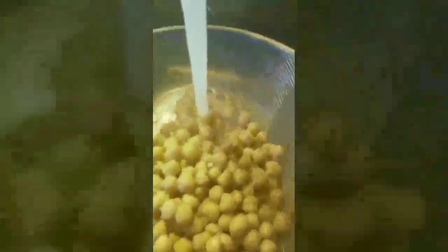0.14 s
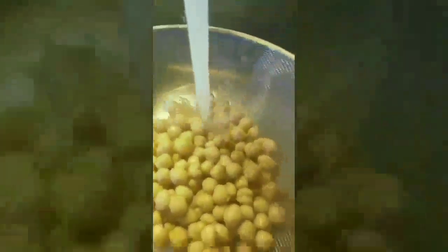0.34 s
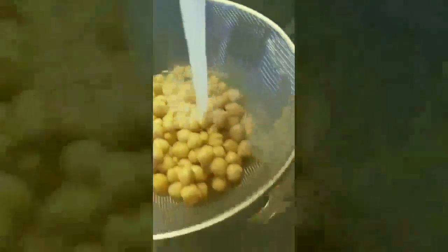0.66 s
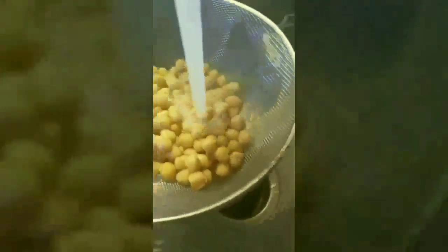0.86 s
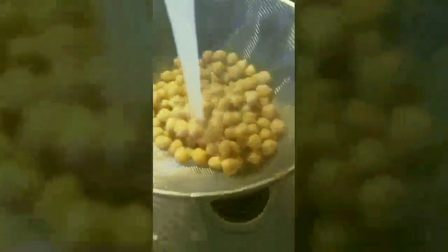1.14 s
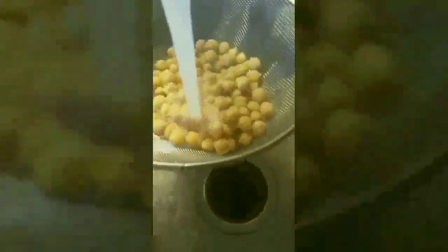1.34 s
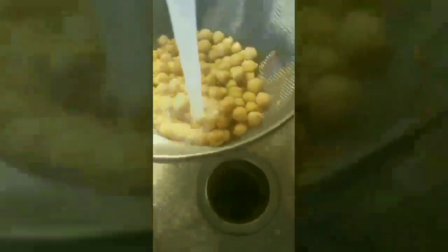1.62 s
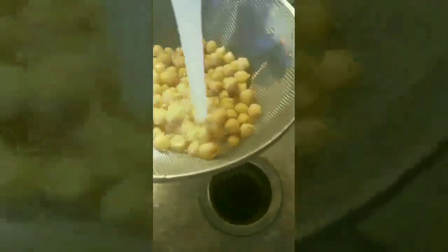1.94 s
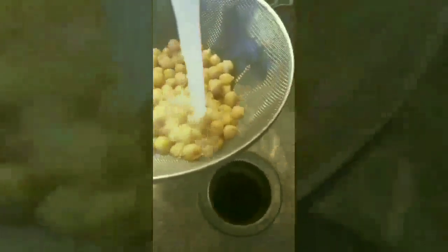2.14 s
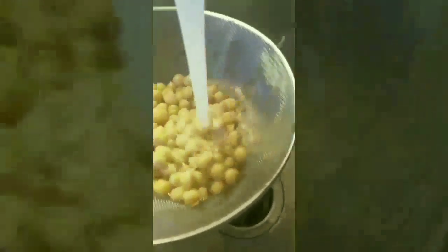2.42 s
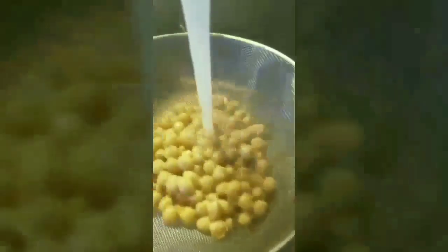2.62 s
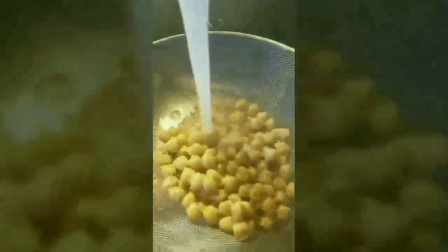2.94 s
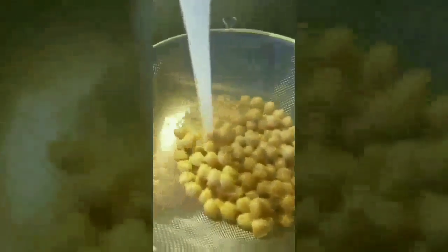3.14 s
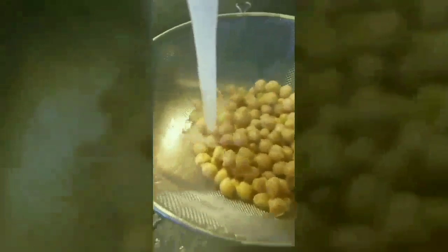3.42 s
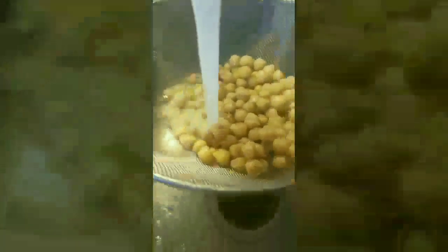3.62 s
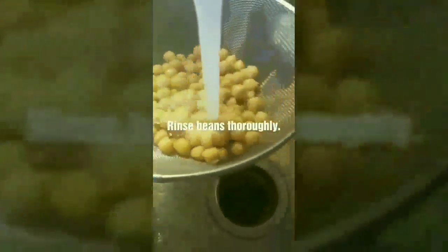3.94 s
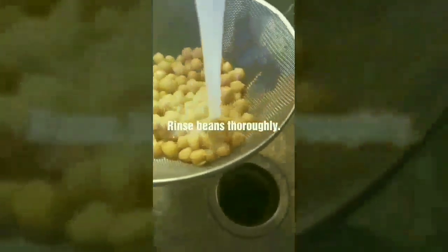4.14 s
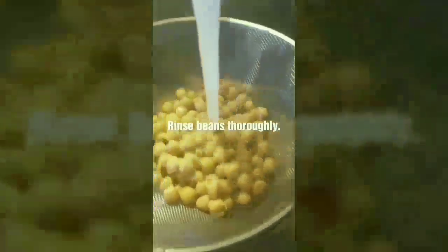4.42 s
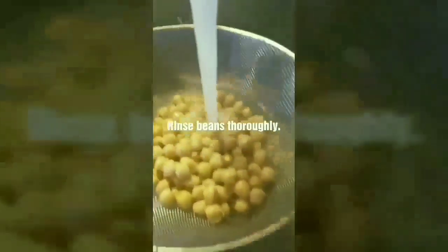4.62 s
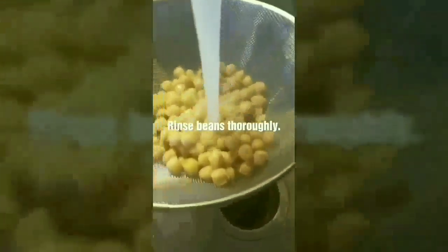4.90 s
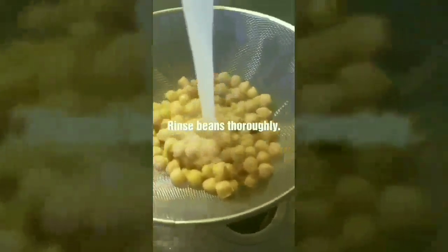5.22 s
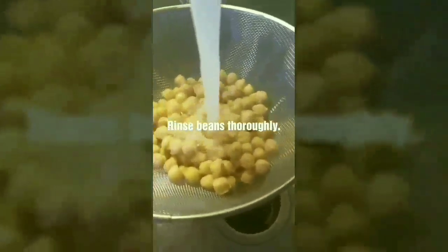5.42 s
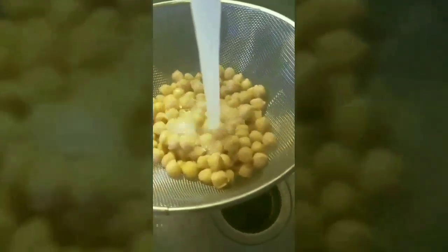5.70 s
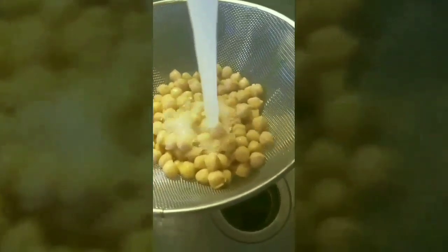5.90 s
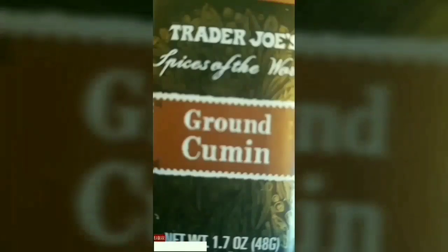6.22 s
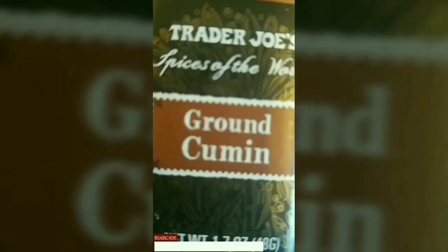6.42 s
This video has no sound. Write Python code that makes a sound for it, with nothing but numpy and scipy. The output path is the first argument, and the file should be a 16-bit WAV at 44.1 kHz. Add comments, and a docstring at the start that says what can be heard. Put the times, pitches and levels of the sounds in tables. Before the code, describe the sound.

Tap water hisses brightly onto beans in a wire strainer over a steel sink, with low uneven drumming below, then stops abruptly.

```python
"""A bright, hissing rush of water over a low, uneven drumming is heard at once: a tap runs onto
beans in a wire strainer that is moved about over a steel sink. The aerated jet is made of random
drops and bubbles, with resonators for the ringing metal. Runoff drives lower modes of the sink
floor, with swelling tones for slops and plops and filtered drop clusters for gushes that spatter
on the steel. The sound stops abruptly."""
import sys
import numpy as np
from scipy import signal
from scipy.fft import rfft, irfft, next_fast_len
from scipy.io import wavfile
from scipy.ndimage import uniform_filter1d

SR = 44100
rng = np.random.default_rng(int(sys.argv[2]) if len(sys.argv) > 2 else 0)


def transcribe(u):
    """Save the signal u as a 16-bit wav file named by the first command-line argument.

    u: samples, shape (n,) or (channels, n), limited to [-1, 1]; the rate is SR.
    q: integer samples, one column per channel.
    """
    v = np.clip(np.atleast_2d(u).T, -1, 1)
    q = np.round(v * 32767).astype(np.int16)
    wavfile.write(sys.argv[1], SR, q)


N = 289296
TIME = np.arange(N) / SR   # seconds

# In every table, left-right is the level of the left side over the right.
# Strength of the jet on the beans, weakest where it slips onto the bare mesh.
# Each row: time in seconds, relative level in dB.
JET_STRENGTH = [(0.0, -24.5), (0.45, -25.5), (0.75, -24.5), (1.08, -26), (1.62, -25), (1.75, -24.5),
                (2.5, -27.0), (2.65, -28), (3.1, -27), (3.22, -26.5), (3.75, -25.5), (3.95, -26.5),
                (4.22, -25.5), (4.45, -26), (5.1, -25.5), (5.55, -26), (5.95, -25), (6.35, -26)]
# Colour of the splashes. Each row: frequency in Hz, relative level per Hz in dB, left-right in dB.
SPLASH_SPECTRUM = [(498, -19, -13.5), (1055, -25.5, -5), (1263, -17, -2), (1643, -6, 0), (1970, -7, 0),
                   (2270, -4.5, -2.5), (2840, -3, -3), (3500, -1, 2.5), (4400, -0.5, -0.5),
                   (5920, -7.5, -3), (8900, -23.5, 7.5)]
# Colour of the fine spray. Each row: frequency in Hz, relative level per Hz in dB, left-right in dB.
SPRAY_SPECTRUM = [(3000, -38, 5.5), (4370, -2, 0), (5830, -1, 1), (7400, -0.7, 2.5), (8850, -2.5, -1),
                  (10100, 1, 1), (12200, 2, 1), (14100, -1.5, 2.5), (14880, -0.5, 6), (15600, -17.5, -2)]
# Resonances of strainer and basin under the splashes. Each row: frequency in Hz, width in Hz,
# relative level in dB, left-right in dB, phase lead of the left side in radians.
SPLASH_RESONANCES = [(1450, 80, -23, -3, 2.5), (1720, 90, -12.5, -1, -2.8), (1980, 90, -22, 0, -2.8),
                     (2207, 42, -16.5, 2, -2.2), (2422, 120, -16.5, 0, -1.2), (2939, 70, -13.5, 8, .4),
                     (3029, 42, -10.5, 1, -.1), (3122, 44, -10.5, 4, .5), (3207, 60, -11.5, 9, .8),
                     (3416, 75, -14.2, 8, 1.2), (3700, 140, -14, 0, .9), (4085, 110, -10.3, 2, 1),
                     (4370, 150, -9, -7, 2.4)]
# Resonances of strainer and basin under the spray. Each row: frequency in Hz, width in Hz,
# relative level in dB, left-right in dB, phase lead of the left side in radians.
SPRAY_RESONANCES = [(7967, 130, -18, 1, .4), (9515, 160, -20, 6, -2.6), (10476, 100, -16, 6, .9),
                    (10690, 80, -16, 4, .6), (11725, 80, -8.3, 0, -2.1), (12054, 110, -17, 7, .7),
                    (12470, 110, -11.5, 9, 0), (12625, 240, -13.5, 4, .4), (12990, 250, -12.5, 12, -.6),
                    (13539, 175, -12.3, 9, -1.6)]
# The stream reaches the wire and the metal rings out.
# Each row: time of the height in seconds, half length (to 1/e of the dB) in seconds, extra level in dB.
METAL_SWELLS = [(1.55, .18, 3), (4.39, .06, 3), (5.8, 0.09, 1.5)]
# The clearest ring of the wire, which follows where the stream lands.
# Each row: time in seconds, relative level in dB, pitch shift in Hz.
WIRE_PATH = [(0.0, -8, 0), (0.2, -11, 0), (0.4, -10.5, 0.5), (0.9, -12, 0), (1.28, -6.5, -20.5),
             (1.5, -12.5, 0), (1.8, -11.5, 24.5), (2.2, -6.5, 30), (2.75, -7.5, 20), (3.1, -14, 0),
             (3.42, -8, 40), (3.75, -12.5, -1.5), (3.95, -8.5, -13.5), (4.25, -9, -20.5), (4.7, -10, -20),
             (5.2, -11, -29.5), (5.45, -8.5, -35), (5.8, -8.5, 5), (6.12, -8, 11), (6.3, -7, 10)]
# Its two close modes. Each row: frequency in Hz, width in Hz, relative level in dB,
# left-right in dB, phase lead of the left side in radians.
WIRE_RESONANCES = [(2594, 40, -1.6, -7, .1), (2660, 56, -4.5, 0, .4)]
# Water falling through the strainer as it is moved about. Each row: time in seconds, relative level
# of the drumming in dB, tilt in dB (added to the left; 0.3 of it is taken from the right).
RUNOFF_PATH = [(0.0, -51.5, -2.5), (0.4, -50, -2), (0.75, -50.5, -3), (1.1, -50.5, -4.5), (1.45, -51.5, -3),
               (1.7, -50.5, -2.5), (2.15, -51, -7), (2.4, -54.5, -1), (2.6, -54.5, 0.5), (3.1, -54, -1),
               (3.3, -52, -2.5), (3.75, -49.5, -2), (4.2, -54.5, -2.5), (4.6, -52.5, -3), (4.95, -51, -4.5),
               (5.3, -50.5, -3.5), (5.5, -53.5, -5.5), (6.05, -50, -0.5), (6.35, -54, -1)]
# Modes of the sink floor. Each row: frequency in Hz, width in Hz, relative level in dB,
# left-right in dB, phase lead of the left side in radians.
SINK_RESONANCES = [(60, 10, -14.5, -8, .3), (119, 27, -3.3, -1.2, -.1), (178, 30, -5.2, -.3, 0),
                   (235, 35, -11.5, -3, -.5), (290, 48, -4.2, -5, -.4), (365, 50, -8.3, -6.5, -.2),
                   (505, 38, -8.2, -10, 0), (590, 50, -11, -9, 1.5), (691, 28, -11, -16, -2.6),
                   (888, 52, -5.7, -3, 2.4), (1081, 36, -11, -10, -.5), (1255, 40, -9, 7, -1.5)]
# Colour of the runoff. Each row: frequency in Hz, relative level per Hz in dB, left-right in dB.
RUNOFF_SPECTRUM = [(20, -37, -7.5), (38, -20.5, -10.5), (61.5, -11, -2), (120, -7.5, 5), (300, -4, -2.5),
                   (600, 0, -30), (1000, 0, 4.5), (1800, -15.5, 6.5)]
# Big bubbles ringing and bursting, on the beans and in the basin. Each row: time of the height in
# seconds, frequency in Hz, peak before panning in dB, swell in seconds, decay in seconds, left-right in dB.
BUBBLE_PLOPS = [(.084, 1480, -43, .005, .007, -1), (.184, 1700, -37, .006, .008, 12),
                (.335, 1760, -32, 0.009, 0.013, 9.5), (.395, 1840, -38, 0.0083, .01, 5),
                (.419, 1710, -37, .004, .0058, -2.5), (.651, 1820, -34.5, 0.0076, 0.0071, -2),
                (1.345, 1760, -43, 0.0033, .007, 0), (1.546, 1711, -44, .007, .009, -3),
                (4.214, 1630, -38, 0.0059, 0.0087, -2), (.026, 2610, -40, 0.013, .014, -14),
                (.066, 2630, -41, .013, .015, -1), (1.303, 2580, -32, .008, .012, -12),
                (1.612, 3040, -34, .018, .018, 3), (1.655, 4080, -32, .012, .013, 6),
                (1.667, 2637, -31.5, .014, .014, -6), (1.930, 4250, -36, .012, .012, -1),
                (3.953, 2600, -38, .011, .013, 1), (4.222, 2610, -34, .018, .02, -5),
                (4.991, 3046, -35, .006, .008, -2), (5.186, 3490, -33, .007, .009, 11),
                (5.264, 2600, -34, .008, .01, -2), (5.370, 3030, -36.5, 0.0072, .01, 3),
                (5.402, 2583, -35, .012, 0.016, -12), (5.801, 3130, -37.5, .014, .015, -1),
                (6.054, 3133, -33, .008, 0.011, 3), (6.135, 2205, -36.5, 0.016, 0.013, 0),
                (6.238, 3046, -36, .014, .011, -1), (6.266, 2630, -32, .008, .012, -10.5),
                (6.308, 2627, -34, .013, .013, -1)]
# Heavier slops landing on the sink floor. Each row: time of the height in seconds, frequency in Hz,
# peak before panning in dB, swell in seconds, decay in seconds, left-right in dB.
FLOOR_SLOPS = [(.052, 322, -42.5, 0.008, .012, -9), (.100, 288, -44, 0.0067, 0.014, -4),
               (.298, 237, -36, .006, 0.0098, -7), (.312, 507, -38.5, 0.0056, 0.0046, -7),
               (.314, 330, -39, .004, .008, -6), (.364, 200, -40.5, .004, .008, -6),
               (.378, 400, -45.5, .006, .009, -7), (.426, 330, -36.5, .0065, .008, -12),
               (.463, 276, -41.5, 0.0057, .012, -7), (.622, 307, -44, .005, .008, -2.5),
               (.750, 287, -43, 0.0042, 0.0071, 0), (2.543, 298, -42, 0.0038, 0.0061, 7),
               (3.277, 126, -40, .012, .03, -4), (3.364, 119, -32, .016, 0.013, -1),
               (3.660, 298, -41, 0.011, 0.022, -13), (3.728, 288, -33.5, 0.0042, .006, -8),
               (3.799, 265, -38.5, 0.0046, .006, -9), (3.801, 160, -45, .015, .03, -4),
               (3.895, 305, -38.5, .006, .008, -11), (3.901, 142, -31, 0.0072, 0.0045, 0),
               (4.050, 514, -44, .004, 0.0092, -6), (4.570, 118, -41, 0.0076, .01, -5),
               (4.805, 128, -40.5, 0.012, .012, -14.5), (5.206, 517, -39.5, 0.0049, .006, -11),
               (6.122, 286, -44, .006, .012, -4)]
# Gushes that spill from the mesh and spatter on the steel. Each row: time of the height in seconds,
# level before the lowpass in dB, swell in seconds, decay in seconds, lowpass corner in Hz.
GUSHES = [(.303, -42, .008, .01, 900), (.428, -33.5, .008, .012, 1100), (2.543, -34, .002, .008, 1300),
          (2.557, -38, 0.0057, 0.0088, 3000), (3.42, -44.5, 0.17, .09, 2600),
          (3.67, -41.5, 0.045, 0.089, 2400), (3.883, -37, .008, .012, 1000)]
# Colour of the gushes. Each row: frequency in Hz, relative level per Hz in dB, left-right in dB.
GUSH_SPECTRUM = [(130, -20.5, 3.5), (350, -6, -6), (900, 1.5, -2.5), (1300, 1.5, -6), (2200, 10.5, 4),
                 (4000, -20, 1)]

LEFT_LEAD_S = 14 / 44100   # direct drops reach the left side first
SPLASH_DB, SPRAY_DB = -10.5, -7   # shares of the jet
SPLASH_SWING = 0.12   # extra dB of splash per dB of jet
STOP_S, STOP_DB_PER_S = 6.357, 786
MIC_LOW_HZ, CUTOFF_HZ = 32, 15700


def from_db(db):
    """Logarithmic level: decibels become an amplitude gain."""
    return 10 ** (np.asarray(db) / 20)


def rms_one(x):
    """Normalization: a signal is scaled to unit root-mean-square."""
    return x / np.sqrt(np.mean(x ** 2) + 1e-20)


def in_time(rows):
    """Interpolation in decibels: each level column becomes a gain curve."""
    s, *columns = np.transpose(rows)
    return [from_db(np.interp(TIME, s, c)) for c in columns]


def panned(pan_db):
    """Level difference between the sides: left and right gains of mean power 1."""
    pair = from_db(np.array([[.5], [-.5]]) * pan_db)
    return pair / np.sqrt(np.mean(pair ** 2, axis=0))


def drift(rate):
    """Lowpass noise: slow chance of spread 1, with both poles at the rate in Hz."""
    step = 40   # samples between computed points
    r = np.exp(-2 * np.pi * rate * step / SR)
    settling = 2000
    noise = rng.standard_normal(N // step + settling + 2)
    slow = signal.lfilter([1], [1, -2 * r, r * r], noise)[settling:]
    return np.interp(np.arange(N) / step, np.arange(len(slow)), rms_one(slow))


def surge(depth_db, rate):
    """Slow amplitude modulation: a gain that wanders by chance."""
    return from_db(depth_db * drift(rate))


def flutter(rate):
    """Bandpass chance: slow swings are removed, leaving quick ones around one rate, of spread 1."""
    quick = drift(rate)
    return rms_one(quick - uniform_filter1d(quick, int(SR / rate)))


def hump(t, swell_s, decay_s):
    """Transient envelope: a Gaussian swell to 1 at t = 0, then exponential decay."""
    return np.exp(-np.where(t < 0, (t / swell_s) ** 2, t / decay_s))


def impacts(per_s, spread_db):
    """Random arrivals: drops land independently, many small and a few large."""
    sizes = from_db(spread_db * np.minimum(rng.exponential(1, N), 5))
    signs = rng.choice([-1, 1], N)
    return sizes * signs * (rng.random(N) < per_s / SR)


def patter(colour, per_s, spread_db, scatter_s, patchy_db, direct, count=5):
    """Direct sound and scattering: each drop is heard, left first, then echoed by the steel walls."""
    drops = impacts(per_s, spread_db)
    at = np.flatnonzero(drops)
    out = direct * np.array([drops, np.roll(drops, round(LEFT_LEAD_S * SR))])
    for side in out:
        late = rng.exponential(scatter_s * SR, (len(at), count)).astype(int)
        echoes = drops[at, None] * rng.standard_normal(late.shape) / np.sqrt(count)
        side += np.bincount((at[:, None] + late).ravel(), echoes.ravel(), N)[:N]

    hz, level_db, pan_db = np.transpose(colour)
    log_hz = np.log(hz)
    size = next_fast_len(N)
    grid = np.log(np.arange(size // 2 + 1) * SR / size + 1)
    level = from_db(np.interp(grid, log_hz, level_db))
    spectrum = rfft(out, size) * level * panned(np.interp(grid, log_hz, pan_db))
    # each part of the colour flickers by itself, by chance, so the sound is patchy
    total = np.zeros((2, N))
    for row in np.eye(len(hz)):
        share = np.interp(grid, log_hz, row)
        band = irfft(spectrum * share, size)[:, :N]
        total += band * surge(patchy_db, rate=15.3)
    return rms_one(total)


def ringing(modes, per_s, spread_db, patchy_db, diffuse, sway_db, wander_hz=0, shift_hz=0):
    """Modal resonance: drops keep each mode ringing; level and pitch wander as the water shifts."""
    out = np.zeros((2, N))
    for hz, width, level_db, pan_db, lead in modes:
        drops = impacts(per_s, spread_db) * from_db(patchy_db * flutter(8.5))
        pole = np.exp((2j * np.pi * hz - np.pi * width) / SR)
        # a second, broader pole: far from its pitch a mode hardly radiates
        broad_pole = pole * np.exp(-3 * np.pi * width / SR)
        ring = signal.lfilter([1], np.poly([pole, broad_pole]), drops + 1e-18)
        bend = 2 * np.pi * np.cumsum(shift_hz + wander_hz * drift(3)) / SR
        turn = bend + np.angle(ring)
        # each side hears its own phase and strength, which sway as the point of impact moves
        left = np.cos(turn + lead + diffuse * drift(21))
        right = np.cos(turn)
        sway = from_db(sway_db * drift(10.3) / 2)
        sides = rms_one(np.abs(ring) * np.array([left * sway, right / sway]))
        out += from_db(level_db) * panned(pan_db) * sides
    return out


def swells(rows):
    """Smooth amplitude modulation: a gain of 1 that rises in Gaussian humps."""
    return from_db(sum(extra_db * np.exp(-((TIME - s) / half_s) ** 2) for s, half_s, extra_db in rows))


def wire():
    """Wandering resonance: the strainer's clearest ring flutters and bends as the stream moves over it."""
    s, level_db, shift_hz = np.transpose(WIRE_PATH)
    ring = ringing(WIRE_RESONANCES, per_s=1500, spread_db=1.5, patchy_db=1.2, diffuse=.5, sway_db=2,
                   wander_hz=18, shift_hz=np.interp(TIME, s, shift_hz))
    contact = rms_one(from_db(3 * np.tanh(1.5 * flutter(11))))
    return from_db(np.interp(TIME, s, level_db)) * contact * ring


def bubbles(per_s, low_hz, high_hz, cycles, rise, spread_db):
    """Bubble resonance: trapped air rings at a pitch of its own, rising as it nears the surface."""
    t = TIME[:int(.03 * SR)]   # a bubble still ringing after 0.03 s is cut off
    count = int(per_s * N / SR)
    when, size, pitch, place, lead = rng.random((count, 5)).T[:, :, None]
    hz = low_hz * (high_hz / low_hz) ** pitch
    age = t * hz / cycles   # at 1 the decay reaches 60 dB
    phase = 2 * np.pi * hz * t * (1 + rise * np.minimum(age, 1))
    onset = (1 - np.exp(-t * hz / 2)) ** 2
    envelope = from_db(-spread_db * np.log(size + .01) - 60 * age) * onset
    at = ((when * N).astype(int) + np.arange(len(t))).ravel()
    left = np.sqrt(place) * np.sin(phase + 2 * np.pi * lead)
    right = np.sqrt(1 - place) * np.sin(phase)
    return rms_one(np.array([np.bincount(at, (envelope * side).ravel(), N)[:N] for side in (left, right)]))


def basin(x, wet_db, decay_s, count=6):
    """Diffuse reflection: dense echoes of sink and worktop differ by side, shifting as the strainer moves."""
    t = TIME[:int(.08 * SR)]
    echoes = rng.standard_normal((count, 2, len(t))) * np.exp(-t / decay_s) * (t > .003)
    echoes /= np.sqrt(np.sum(echoes ** 2, axis=2, keepdims=True))
    shares = np.array([drift(4) for _ in echoes])
    shares /= np.sqrt(np.sum(shares ** 2, axis=0))
    wet = sum(share * signal.oaconvolve(x, path, axes=1)[:, :N] for share, path in zip(shares, echoes))
    return x + from_db(wet_db) * wet


def jet():
    """Jet breakup: the stream bursts on the beans into splashes, small bubbles and spray that surge together."""
    strength, = in_time(JET_STRENGTH)
    splash = from_db(0.18) * patter(SPLASH_SPECTRUM, per_s=5000, spread_db=1.5, scatter_s=.003,
                                    patchy_db=2.0, direct=0.35)
    metal = ringing(SPLASH_RESONANCES, per_s=1500, spread_db=1.8, patchy_db=2.0, diffuse=.55,
                    sway_db=2.5, wander_hz=24)
    splash += from_db(-2.0) * swells(METAL_SWELLS) * surge(depth_db=.5, rate=8) * metal
    splash += wire()
    fizz = bubbles(per_s=240, low_hz=2900, high_hz=9000, cycles=360, rise=.014, spread_db=3.3)
    splash += from_db(-7) * fizz
    spray = from_db(1.0) * patter(SPRAY_SPECTRUM, per_s=14000, spread_db=1.5, scatter_s=.002,
                                  patchy_db=1.24, direct=0.37)
    sizzle = ringing(SPRAY_RESONANCES, per_s=4000, spread_db=1.8, patchy_db=2.0, diffuse=.55,
                     sway_db=1.5, wander_hz=30)
    spray += from_db(-2.2) * sizzle
    # the splashes swing further with the jet than the spray does
    splash *= (strength / strength.mean()) ** SPLASH_SWING
    mix = from_db(SPLASH_DB) * splash + from_db(SPRAY_DB) * spray
    # the strength wanders as the beans shift under the stream
    water = strength * surge(depth_db=0.05, rate=13) * mix
    return basin(water, wet_db=-10.5, decay_s=.014)


def bursts(rows, lead, glide):
    """Transient resonance: a lump of water swells into one tone that dies, the pitch creeping up."""
    out = np.zeros((2, N))
    for s, hz, peak_db, swell_s, decay_s, pan_db in rows:
        near = np.abs(TIME - s) < .2
        t = TIME[near] - s
        tone = np.exp(2j * np.pi * (hz * t * (1 + glide * t) + rng.random()))
        ring = from_db(peak_db) * hump(t, swell_s, decay_s) * tone
        out[:, near] += panned(pan_db) * np.array([(ring * np.exp(1j * lead)).real, ring.real])
    return out


def runoff():
    """Impact excitation: water from the mesh drums on the sink floor and gurgles in the film that covers it."""
    drum_gain, tilt = in_time(RUNOFF_PATH)
    drum = ringing(SINK_RESONANCES, per_s=700, spread_db=1.5, patchy_db=1.7, diffuse=.7, sway_db=3.5)
    drum += from_db(-3.5) * patter(RUNOFF_SPECTRUM, per_s=700, spread_db=4.5, scatter_s=.006,
                                   patchy_db=5.5, direct=0.25)
    gurgle = bubbles(per_s=75, low_hz=500, high_hz=1900, cycles=28, rise=.03, spread_db=2.1)
    drum += from_db(-8.0) * gurgle
    # the runoff comes in lumps, and its landing place follows the strainer
    lumps = surge(depth_db=1.5, rate=16)
    tilt = tilt * surge(depth_db=2.0, rate=4.7)
    drumming = drum_gain * drum * lumps * np.array([tilt, tilt ** -.3])
    plops = bursts(BUBBLE_PLOPS, lead=.4, glide=0.19)
    slops = bursts(FLOOR_SLOPS, lead=-.1, glide=0.35)
    return drumming + plops + slops


def splats():
    """Clustered impacts: each gush is a tight burst of drops, duller where the film of water is deep."""
    drops = patter(GUSH_SPECTRUM, per_s=3000, spread_db=1.5, scatter_s=.002, patchy_db=1, direct=.5)
    out = np.zeros((2, N))
    for s, db, swell_s, decay_s, top_hz in GUSHES:
        gush = drops * from_db(db) * hump(TIME - s, swell_s, decay_s)
        lowpass = signal.butter(2, top_hz, fs=SR, output="sos")
        out += signal.sosfilt(lowpass, gush + 1e-18)
    return out


def scene():
    """Superposition: jet, runoff and gushes add together, until the abrupt stop."""
    stop = from_db(-STOP_DB_PER_S * np.maximum(TIME - STOP_S, 0))
    return (jet() + runoff() + splats()) * stop


def record(dry):
    """Band limiting: the microphone loses the deepest bass, and the top is cut steeply."""
    highpass = signal.butter(2, MIC_LOW_HZ, "high", fs=SR, output="sos")
    lowpass = signal.ellip(12, .1, 80, CUTOFF_HZ - 200, fs=SR, output="sos")
    return signal.sosfilt(lowpass, signal.sosfilt(highpass, dry))


dry = scene()
out = record(dry)
transcribe(out)
```